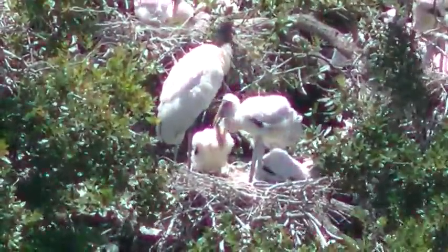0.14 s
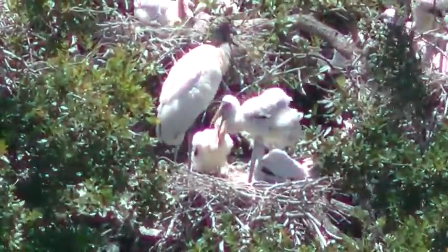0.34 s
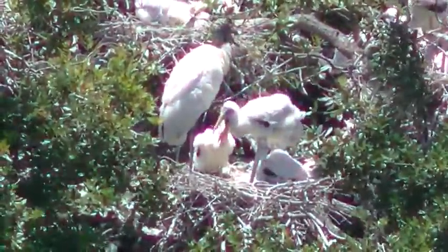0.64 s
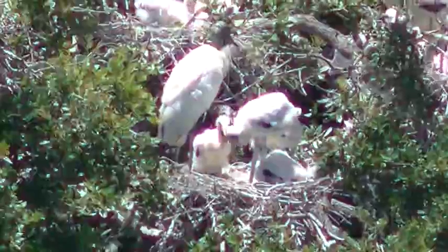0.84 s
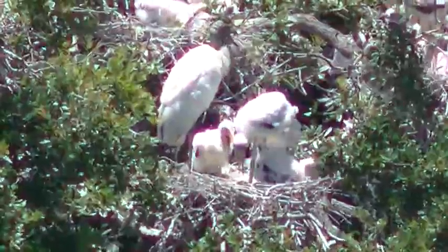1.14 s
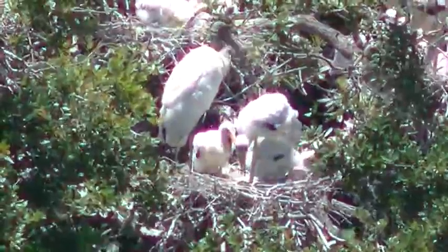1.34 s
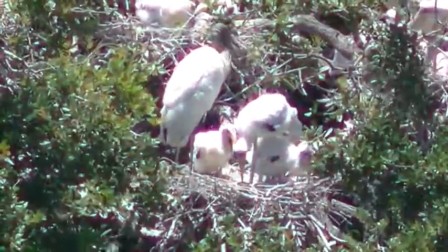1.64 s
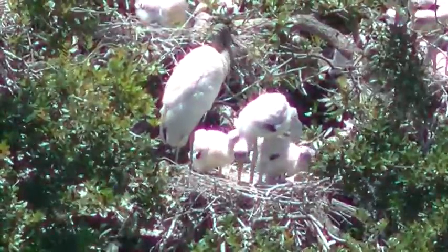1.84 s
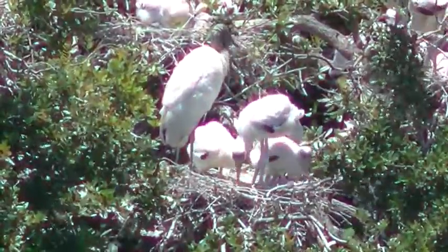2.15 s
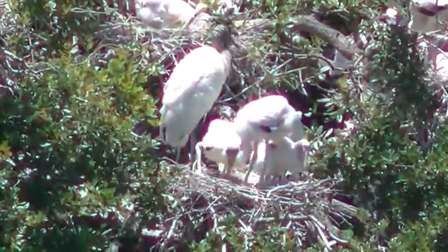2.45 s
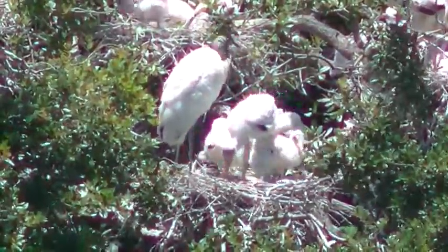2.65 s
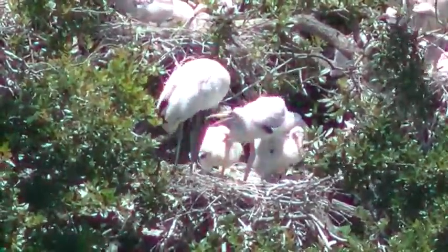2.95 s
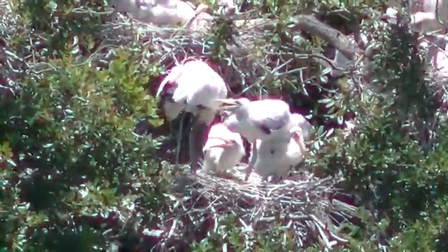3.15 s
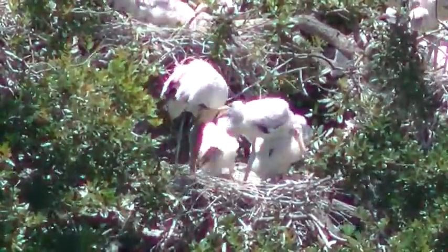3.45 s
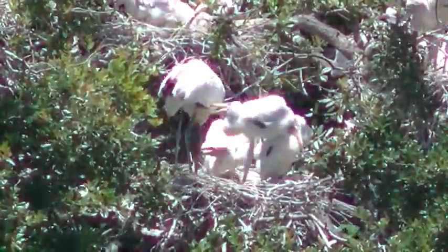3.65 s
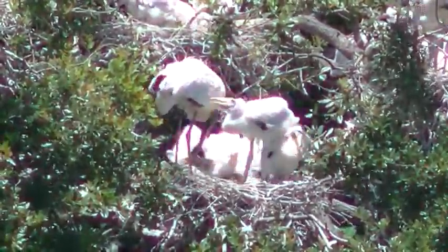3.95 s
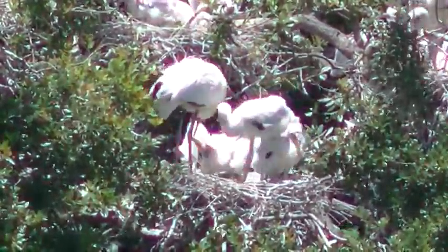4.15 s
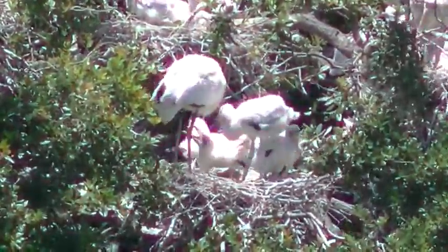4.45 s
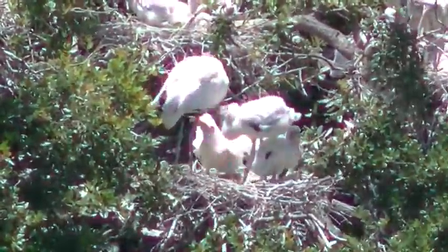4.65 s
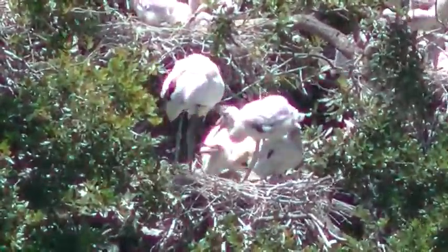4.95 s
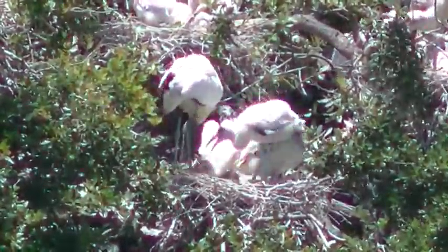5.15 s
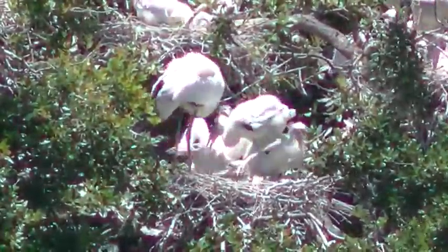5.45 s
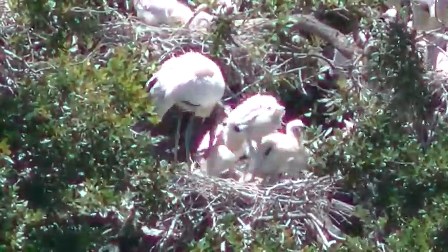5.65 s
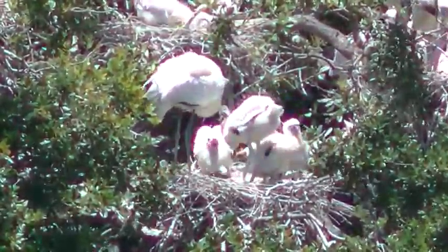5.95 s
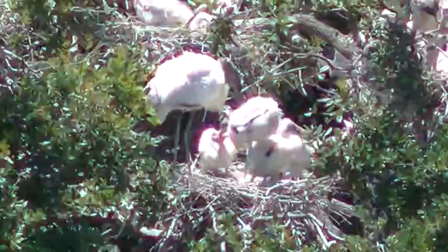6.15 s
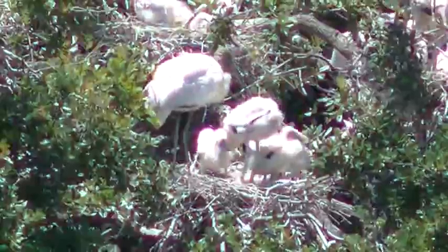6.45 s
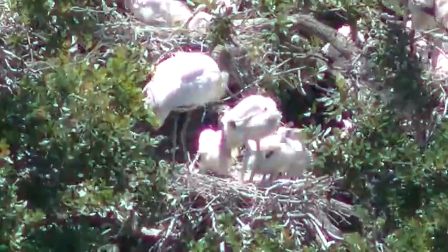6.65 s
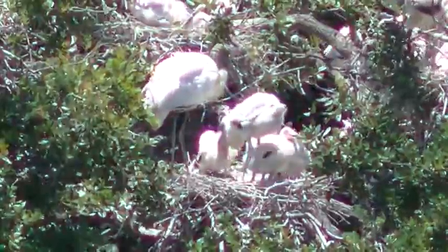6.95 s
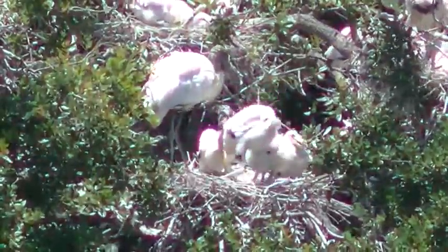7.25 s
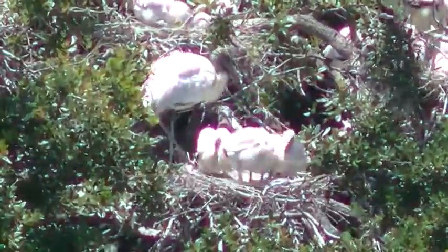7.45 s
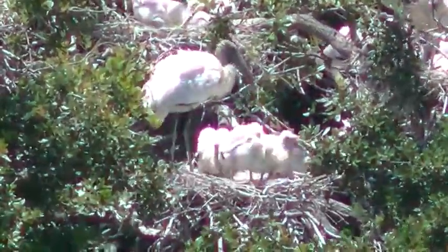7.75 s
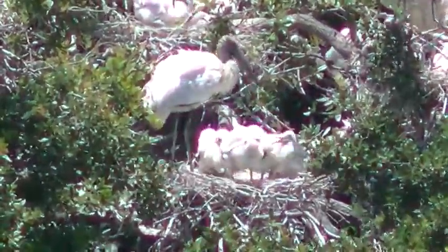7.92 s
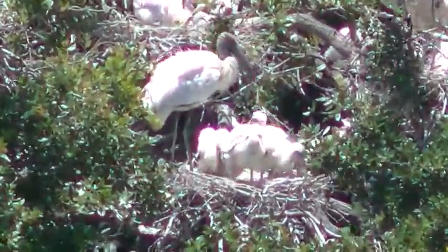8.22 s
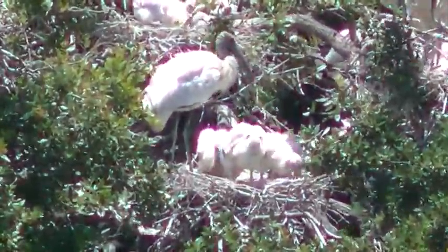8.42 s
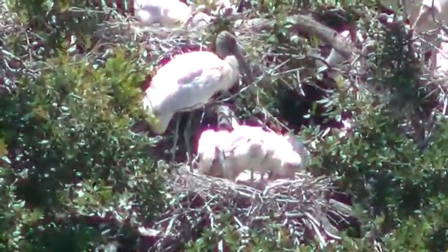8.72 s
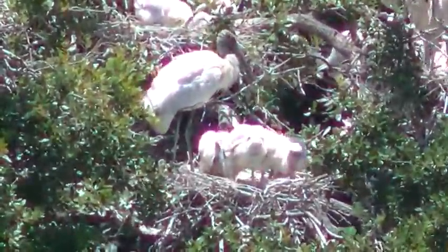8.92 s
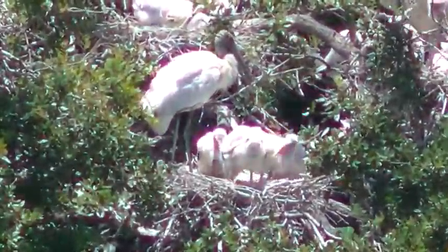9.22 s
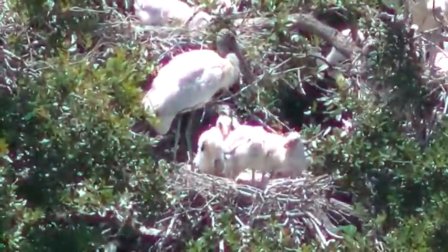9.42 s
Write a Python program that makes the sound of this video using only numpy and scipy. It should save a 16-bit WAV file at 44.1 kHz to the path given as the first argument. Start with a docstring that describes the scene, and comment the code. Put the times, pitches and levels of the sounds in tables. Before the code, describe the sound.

Twigs snap and leaves rustle close by while distant stork chicks chatter, then a songbird repeats two notes over a steady, high cicada buzz.

```python
"""Twigs snap and leaves rustle close by, while stork chicks squawk in a colony and songbirds whistle. After a
brief silence a wren repeats a two-note phrase and a cicada buzzes steadily. Breaking wood rings like a damped
oscillator; a squawk is a raspy source filtered by the throat; the cicada's buckling tymbals drive its resonant
abdomen. The trees scatter faint echoes, and the microphone doubles every sound a few milliseconds later, a comb
filter that sounds slightly hollow."""
import sys
import numpy as np
from scipy import signal
from scipy.fft import rfft, irfft
from scipy.io import wavfile
from scipy.ndimage import uniform_filter1d

SR = 44100
rng = np.random.default_rng(int(sys.argv[2]) if len(sys.argv) > 2 else 0)


def inscribe(sig):
    """Save sig as 16-bit PCM at rate SR to the path in sys.argv[1].

    A 1-D sig is mono; a 2-D sig holds one channel per row.
    Samples are clipped to [-1, 1] before scaling.
    """
    pcm = np.round(np.clip(np.atleast_2d(sig).T, -1, 1) * 32767)
    wavfile.write(sys.argv[1], SR, pcm.astype(np.int16))


N = 422468
TIME = np.arange(N) / SR
SILENCE_START_S, SILENCE_END_S = 3.3414, 3.3962
# spectrum of rubbing leaves and splintering wood: frequency_hz, density_db
RUSTLE_SPECTRUM = [(200, -31), (1200, -14.5), (1700, -2.5), (3000, -0.5), (4800, -2.5), (6500, -6),
                   (8000, -13), (9500, -15), (10800, -15), (12200, -8.5), (15500, -31)]


def gain_of(db):
    """Amplitude ratio of a level in decibels."""
    return 10 ** (np.asarray(db) / 20)


def unit_rms(x):
    """Normalisation to unit mean power."""
    return x / np.sqrt(np.mean(x ** 2) + 1e-20)


def over_time(rows):
    """Linear interpolation of each column between the times in the first."""
    time_s, *columns = np.transpose(rows)
    return [np.interp(TIME, time_s, column) for column in columns]


def at_bins(spectrum, size=N):
    """Interpolation in log frequency onto the bins of a Fourier transform."""
    hz, value = np.transpose(spectrum)
    return np.interp(np.log(np.fft.rfftfreq(size, 1 / SR) + 1), np.log(hz), value)


def coloured(x, spectrum):
    """Zero-phase filtering by a spectral envelope, normalised to unit power."""
    size = x.shape[-1]
    return unit_rms(irfft(rfft(x) * gain_of(at_bins(spectrum, size)), size))


def drift(per_s):
    """Random modulation of unit power: straight lines between Gaussian values."""
    knots = rng.standard_normal(4096)
    return unit_rms(np.interp(TIME * per_s, np.arange(len(knots)), knots))


def add(mix, start_s, sound):
    """Superposition of a sound on the mix, in place."""
    part = mix[max(round(start_s * SR), 0):][:len(sound)]
    part += sound[:len(part)]


def resonate(x, hz, width_hz):
    """A damped resonator of unit peak gain whose centre frequency may move."""
    carrier = np.exp(2j * np.pi * np.cumsum(hz * np.ones(len(x))) / SR)
    pole = np.exp(-np.pi * width_hz / SR)
    return 2 * (carrier * signal.lfilter([1 - pole], [1, -pole], x / carrier + 1e-18)).real


def highpass(x, hz, order):
    """Radiation efficiency: small bodies give off little bass."""
    return signal.sosfilt(signal.butter(order, hz, "highpass", fs=SR, output="sos"), x)


def bend(length_s, pitches_hz):
    """A parabolic glide through a start, a middle and an end pitch."""
    return np.polyval(np.polyfit([0, .5, 1], pitches_hz, 2), np.linspace(0, 1, int(length_s * SR)))


def note(hz, taper):
    """A pure tone with soft ends; its phase is the integral of its frequency."""
    return unit_rms(np.sin(2 * np.pi * np.cumsum(hz) / SR) * signal.windows.tukey(len(hz), taper))


def air():
    """Partly coherent noise: a steady outdoor hush, wide in the bass where the two sides differ."""
    # outdoor hush: frequency_hz, density_db
    spectrum = [(25, -20), (80, -17), (135, -4), (200, -9), (290, 0), (600, -2), (1200, -3), (3000, -3),
                (8000, -5), (12000, -3), (16000, -7)]
    # likeness of left and right: frequency_hz, correlation
    likeness = [(60, 0.033), (350, 0.011), (650, 0.95), (3000, 0.99), (8000, 0.28), (11500, 1)]
    correlation = np.clip(at_bins(likeness), 0, 1)
    left, independent = rfft(rng.standard_normal((2, N)))
    right = correlation * left + np.sqrt(1 - correlation ** 2) * independent
    return gain_of(-65) * coloured(irfft(np.array([left, right]), N), spectrum)


def tree_echoes(x, t60_s=0.091):
    """Scattering by trunks and leaves: sparse, decaying echoes, different on each side."""
    t = np.arange(SR // 2) / SR
    taps = rng.standard_normal((2, len(t))) * (rng.random((2, len(t))) < .05)
    taps *= gain_of(-60 * t / t60_s) * (t > .006)
    return signal.fftconvolve(x[None], taps / np.linalg.norm(taps[0]), axes=1)[:, :N]


def squawk(length_s, hz, throat_hz, rough, width_hz, fall=.17, scoop=0.1396, scoop_share=0.1299):
    """Source and filter: raspy harmonics scoop up and fall, through a sinking throat resonance."""
    progress = np.linspace(0, 1, int(length_s * SR))
    pitch_hz = hz * (1 - fall * progress ** 1.5 - scoop * np.exp(-progress / scoop_share))
    cycles = np.cumsum(pitch_hz) / SR
    voiced = sum(np.cos(2 * np.pi * k * cycles) for k in range(2, 10))
    rasp = rng.standard_normal(len(progress)) * (1 + np.cos(2 * np.pi * cycles))
    voice = (1 - rough) * unit_rms(voiced) + rough * unit_rms(rasp)
    formant_hz = throat_hz * (1 - fall * (progress - .5))
    for _ in range(2):
        voice = resonate(voice, formant_hz, width_hz)
    return unit_rms(voice * np.sin(np.pi * progress))


def colony(count=420, spread_db=8):
    """Incoherent summation: hundreds of far squawks, with those still farther off blurred to noise."""
    # the far colony: frequency_hz, density_db
    spectrum = [(600, -17.5), (1350, -12.5), (1600, -1), (1900, 4.5), (2700, 2), (3700, 2.5), (5000, 1),
                (6500, -6.5), (8500, -46), (15000, -9)]
    # its activity, one list before the silence and one after: time_s, level_db
    activity = [
        [(0.0, -56), (0.34, -59), (1.15, -61.5), (1.42, -61.5), (1.78, -56), (2.73, -64.5), (3.33, -61.5)],
        [(3.45, -52.5), (3.55, -55.5), (6.69, -54.5), (7.43, -53), (8.67, -57), (9.22, -54), (9.58, -58)],
    ]
    calls = np.zeros(N)
    for when, length, pitch, throat, rough, size in rng.random((count, 6)):
        call = squawk(0.0399 + .08 * length, 450 + 400 * pitch, 1700 + 3000 * throat,
                      0.85 * rough, width_hz=1100)
        add(calls, when * N / SR, gain_of(spread_db * size) * call)
    blur = rng.standard_normal(N) * gain_of(drift(30))
    chatter = gain_of(-4) * coloured(calls, spectrum) + gain_of(-1) * coloured(blur, spectrum)
    level_db, = over_time(np.vstack(activity))
    return gain_of(level_db) * chatter


def bird_calls(flutter_db=2, far_count=24, far_low_hz=1800, far_high_hz=4300, far_db=-69):
    """Modulated pure tones: near whistles, the falling overtones of a chick's squawk, and far slides."""
    # whistles and squawk overtones: start_s, length_s, start_hz, middle_hz, end_hz, level_db
    near_tones = [(0.053, 0.061, 3600, 3570, 3150, -58), (2.224, 0.026, 2900, 3130, 3420, -64),
                  (2.244, 0.058, 3970, 3800, 3700, -63), (2.333, 0.093, 4450, 4590, 4530, -56.5),
                  (2.41, 0.099, 1853, 1823, 1790, -60.5), (2.493, 0.058, 4090, 3960, 3600, -59),
                  (2.693, 0.022, 2830, 3100, 3400, -60), (2.698, 0.075, 4330, 4030, 3380, -61.5),
                  (2.786, 0.05, 3530, 2980, 2600, -56.5), (3.113, 0.227, 1930, 1883, 1930, -68),
                  (6.032, 0.068, 2880, 3324, 2990, -47), (5.841, 0.097, 2950, 2280, 2170, -61),
                  (6.286, 0.1, 2950, 2080, 2190, -57.5), (6.492, 0.049, 2930, 3143, 3220, -48.5),
                  (6.692, 0.077, 1605, 1924, 1600, -58.5), (6.806, 0.028, 2204, 2470, 2700, -56),
                  (6.895, 0.085, 4060, 3400, 3350, -45.5), (7.404, 0.06, 3710, 3800, 3740, -53),
                  (7.647, 0.16, 3120, 3040, 3100, -57), (8.179, 0.061, 3760, 3710, 3640, -56)]
    out, wobble = np.zeros(N), 1 + .018 * drift(400)
    for start_s, length_s, *pitches_hz, level_db in near_tones:
        hz = bend(length_s, pitches_hz)
        hz *= wobble[int(start_s * SR):][:len(hz)]
        add(out, start_s, gain_of(level_db) * note(hz, taper=0.34))
    for slot, (when, length, pitch, slide) in enumerate(rng.random((far_count, 4))):
        length_s = .06 * (.5 + length)
        glide = 1 + .09 * (2 * slide - 1) * np.linspace(-1, 1, int(length_s * SR))
        hz = far_low_hz * (far_high_hz / far_low_hz) ** pitch * glide
        add(out, (slot + when) / far_count * N / SR, gain_of(far_db) * note(hz, taper=0.91))
    return out * gain_of(flutter_db * drift(200))


def near_chicks(throat_ratio=4.58):
    """Formant resonance: each near chick's throat rings at the same multiple of its pitch."""
    # chick calls: start_s, length_s, pitch_hz, roughness, level_db
    calls = [(0.046, 0.075, 758, 0.2, -54), (1.105, 0.105, 760, .52, -56.5), (1.352, 0.085, 775, 0.62, -56),
             (2.71, .12, 800, .7, -60), (4.272, 0.021, 630, 0.74, -47.5), (4.629, 0.037, 610, 0.86, -48),
             (5.324, 0.056, 510, .7, -54), (5.397, .025, 675, 0.3, -50.5), (5.723, 0.1, 702, 0.9, -55),
             (5.852, 0.063, 711, 0.7, -52), (5.958, 0.066, 690, 0.9, -53.5), (7.524, .055, 516, 0.65, -56),
             (9.106, 0.071, 450, 0.83, -57), (9.488, .095, 440, 0.62, -51)]
    out = np.zeros(N)
    for start_s, length_s, pitch_hz, roughness, level_db in calls:
        call = squawk(length_s, pitch_hz, throat_ratio * pitch_hz, roughness, width_hz=1380)
        add(out, start_s, gain_of(level_db) * call)
    return out


def wren(pitch_hz=2497, drop_hz=656, rate_hz=58, depth_hz=248, trill_s=0.09, settle_s=.017):
    """Frequency modulation: a rising slur, then a note that drops into a fast, widening trill."""
    # two-note phrases: start_s, trill_db, slur_db
    phrases = [(3.355, -53, -53), (3.599, -53.5, -50.5), (3.847, -53, -52), (4.09, -53, -51.5),
               (4.339, -50.5, -54), (4.598, -51.5, -59), (4.881, -53.5, -59), (5.146, -52, -54.5),
               (5.415, -52.5, -52)]
    out, t = np.zeros(N), np.arange(0, trill_s, 1 / SR)
    unsettled = np.exp(-t / settle_s)
    slur = note(bend(length_s=0.0493, pitches_hz=(3080, 3470, 3510)), taper=0.45)
    for start_s, trill_db, slur_db in phrases:
        swing_hz = depth_hz * (1 - unsettled) * np.sin(2 * np.pi * (rate_hz * t + rng.random()))
        trill = note(pitch_hz + drop_hz * unsettled + swing_hz, taper=0.32)
        add(out, start_s, gain_of(slur_db) * slur)
        add(out, start_s + .07, gain_of(trill_db) * trill)
    return out


def friction(strokes, spectrum, grain_db, slips_per_s):
    """Stick-slip friction: short strokes of noise, made grainy by tiny uneven slips."""
    envelope = np.zeros(N)
    for start_s, length_s, level_db in strokes:
        add(envelope, start_s, gain_of(level_db) * signal.windows.tukey(int(length_s * SR), .5))
    slips = rng.standard_normal(N) * gain_of(grain_db * drift(slips_per_s))
    return envelope * coloured(slips, spectrum)


def handling_bumps():
    """Contact noise: handling makes soft, low strokes of friction."""
    # bumps: start_s, length_s, level_db
    strokes = [(1.51, 0.16, -65), (1.795, 0.028, -59.5), (1.86, 0.16, -59), (2.08, 0.04, -54.5),
               (2.292, 0.013, -59), (2.413, 0.07, -64.5), (2.51, 0.023, -56), (2.905, 0.05, -57),
               (2.96, 0.16, -70), (3.235, 0.016, -56.5)]
    # their dull colour: frequency_hz, density_db
    spectrum = [(30, -38), (130, -6), (240, -4), (450, 2), (900, -6), (1500, -8), (3000, -44)]
    return friction(strokes, spectrum, grain_db=4, slips_per_s=130)


def rustles():
    """Friction noise: leaves and twigs rub, and the drier ones add a crisp treble."""
    # rubbing strokes: start_s, length_s, level_db, relative_treble_db
    strokes = [(0.123, 0.16, -50, -7), (0.312, 0.11, -60.5, -3), (0.64, 0.12, -51, -11),
               (0.797, 0.067, -57, -9), (1.517, 0.12, -52, -21), (1.68, 0.27, -55, -25),
               (1.915, 0.089, -45.5, -20), (2.053, 0.072, -54, -15), (2.174, 0.03, -50.5, -15),
               (2.296, 0.13, -48.5, -9), (2.901, 0.047, -51, -18)]
    # treble of dry leaves: frequency_hz, density_db
    crisp_spectrum = [(3500, -20), (7000, -8), (9500, 0), (13000, -8), (16000, -3)]
    body = friction([row[:3] for row in strokes], RUSTLE_SPECTRUM, grain_db=4, slips_per_s=600)
    crisp = [(start_s, length_s, db + treble_db) for start_s, length_s, db, treble_db in strokes]
    return body + friction(crisp, crisp_spectrum, grain_db=2, slips_per_s=1400)


def after_rings(decay_s=0.052):
    """Free vibration: faint tones decay exponentially after the snap that struck them."""
    # lingering tones: start_s, pitch_hz, level_db
    tones = [(0.748, 4020, -58), (0.748, 2380, -59), (1.997, 795, -61.5)]
    out, t = np.zeros(N), np.arange(SR // 3) / SR
    for start_s, pitch_hz, level_db in tones:
        add(out, start_s, gain_of(level_db) * np.sin(2 * np.pi * pitch_hz * t) * np.exp(-t / decay_s))
    return out


def twig_snaps(knock_hz=1700, knock_s=0.0028, splinter_s=0.00096, tail_s=0.007, crack_s=0.00017):
    """Brittle fracture: a woody ring, a knock and splinters; brittle twigs crack more and knock less."""
    # breaking twigs: start_s, relative_energy_db, ring_hz, brittleness_db, ring_decay_s
    fractures = [(0.0785, -34.5, 9300, 6, 0.00095), (0.0903, -30, 1910, -16, 0.001),
                 (0.2937, -24, 3700, 3, 0.0013), (0.3206, -30, 2900, 12, 0.00051),
                 (0.383, -38, 9800, 11, 0.00099), (0.452, -38.5, 5080, 4, 0.001),
                 (0.7448, -32.5, 3070, 9, 0.0023), (0.8664, -35.5, 2970, 7, 0.00027),
                 (0.8973, -35, 3220, 8, 0.0003), (1.512, -35, 1570, -8, 0.0014),
                 (1.6606, -21, 3650, -20, 0.0012), (1.6664, -14, 4730, 6, 0.00053),
                 (1.802, -37, 1890, -11, 0.0022), (1.9113, -20, 3027, 2, 0.0051),
                 (1.996, -11.5, 3900, -10.5, 0.00048), (2.032, -34, 3790, 4, 0.00056),
                 (2.2977, -34.5, 1940, -1, 0.0055), (2.5171, -39, 3900, -15, 0.0011),
                 (2.8317, -38.5, 3940, 0, 0.002), (2.9193, -36.5, 3900, 11, 0.0013),
                 (2.9746, -41, 2200, -3, 0.00074), (3.0652, -35, 2770, -13, 0.0015),
                 (6.6299, -22.5, 5030, -1, 0.00058)]
    out, t = np.zeros(N), np.arange(2048) / SR
    for start_s, energy_db, ring_hz, brittle_db, ring_s in fractures:
        ring = np.sin(2 * np.pi * ring_hz * t) * np.exp(-t / ring_s)
        knock = gain_of(-22 - brittle_db) * np.sin(2 * np.pi * knock_hz * t) * np.exp(-t / knock_s)
        grit, spray = rng.standard_normal((2, len(t)))
        splinter_decay = np.exp(-t / splinter_s) + 0.3 * np.exp(-t / tail_s)
        splinters = 0.4 * coloured(grit, RUSTLE_SPECTRUM) * splinter_decay
        crack = gain_of(brittle_db - 5) * spray * np.exp(-t / crack_s)
        snap = ring + knock + splinters + crack
        snap /= np.linalg.norm(snap)  # the break sets the energy, however it splinters
        add(out, start_s + 0.000796, gain_of(energy_db + 12.5) * snap)
    return highpass(out, 1200, order=3)


def tymbal_clicks(lag_s, flutter=0.076):
    """An impulse train: two tymbals buckle in turn, the second weaker and slightly late."""
    # the buckling speeds up, then settles: time_s, cycle_hz
    rates = [(3.4, 132.75), (3.8, 133.6), (4.4, 135.36), (6.2, 138.9), (6.8, 139.85), (7.1, 139.1),
             (8.0, 139.2), (8.3, 138.45), (9.58, 138.65)]
    cycle_hz, = over_time(rates)
    cycles = np.cumsum(cycle_hz) / SR
    pulses = np.zeros(N)
    # half a cycle apart the tymbals favour even harmonics; half a ring period later, odd ones
    for strength, phase in ((1, cycles), (.75, cycles - .5 - lag_s * cycle_hz)):
        offset_samples = (phase % 1 - .5) / cycle_hz * SR
        pulses += strength * np.sinc(offset_samples / 2) * np.exp(-(offset_samples / 10) ** 2)
    return unit_rms(np.diff(pulses, prepend=0) * (1 + flutter * drift(270)))


def cicada(shimmer=0.68, fizz_db=-11, ease_s=0.6):
    """Forced resonance: tymbal clicks ring the hollow abdomen; uneven buckling makes the buzz rough."""
    # effort and tuning of the abdomen: time_s, level_db, resonance_hz
    effort = [(3.4, -52, 4520), (3.92, -52, 4670), (4.1, -50.5, 4720), (4.66, -48, 4820),
              (5.0, -50.5, 4850), (5.55, -49.5, 4890), (6.15, -46.5, 4490), (6.6, -54, 4750),
              (6.95, -47, 4560), (7.65, -48.5, 4430), (8.25, -49, 4830), (8.6, -49.5, 4660),
              (9.58, -49, 4530)]
    # high fizz of the buzz: frequency_hz, density_db
    fizz_spectrum = [(4000, -66), (6500, -40), (8200, -19), (9000, -1.5), (9500, 6.5), (9950, 10),
                     (10500, -0.5), (10900, -1.5), (11500, -2), (12700, -0.5), (13300, 0), (13900, -2.5),
                     (15800, -40)]
    # the stroke locks in, so the buzz clears and the second tymbal lags: start_s, end_s
    spells = [(4.0, 6.1), (8.12, 9.9)]
    level_db, resonance_hz = over_time(effort)
    locked = sum(np.clip(.5 + np.minimum(TIME - start, end - TIME) / ease_s, 0, 1)
                 for start, end in spells)
    noise_share = 0.4 - 0.24 * locked
    clicks = tymbal_clicks(lag_s=.00002 + .00008 * locked)
    # paths through moving leaves interfere, so single harmonics swell and fade
    scattered = sum(drift(12) * np.roll(clicks, lag) for lag in rng.integers(20, 250, size=3))
    clicks = unit_rms(clicks + shimmer * scattered)
    rasp = rng.standard_normal(N)
    body = np.sqrt(1 - noise_share) * clicks + np.sqrt(noise_share) * rasp
    for _ in range(4):
        body = resonate(body, uniform_filter1d(resonance_hz, size=8000), width_hz=1500)
    body = highpass(body, 4300, order=12)
    body /= np.sqrt(abs(uniform_filter1d(body ** 2, size=4000)) + 1e-20)  # steady total power
    fizz = coloured(.45 * clicks + rasp, fizz_spectrum) * gain_of(0.59 * drift(5.5))
    buzz = gain_of(level_db) * unit_rms(body) + gain_of(fizz_db + level_db.mean()) * fizz
    return (TIME > SILENCE_START_S) * buzz


def scene(near_width=0.25):
    """Superposition of the outdoor air, the direct sounds and their echoes from the trees."""
    birds = highpass(wren() + bird_calls() + near_chicks(), 1600, order=5)
    near = twig_snaps() + after_rings() + rustles() + handling_bumps()
    side = near_width * np.gradient(near)  # close sounds reach left and right slightly apart in time
    far = colony() + cicada()
    direct = air() + birds + near + np.array([side, -side]) + far
    return direct + tree_echoes(gain_of(-11.5) * birds + gain_of(-19) * far + gain_of(-21.5) * near)


def stereo_widening(x, comb_delay_s=0.000575):
    """Mid-side processing: a comb-filtered copy, added left and subtracted right, widens the sound."""
    # strength of the copy at the comb's peaks: frequency_hz, side_over_mid_db
    side_spectrum = [(300, -7), (1900, -8.5), (3500, -8.5), (5000, -11.5), (7000, -2), (10000, 3.5),
                     (12000, -7.5), (15000, -67)]
    comb = np.cos(np.pi * np.fft.rfftfreq(N, 1 / SR) * comb_delay_s)
    side = irfft(1j * rfft(x.mean(0)) * comb * gain_of(at_bins(side_spectrum)), N)
    return x + np.array([side, -side])


def record(dry, early_hz=8800, early_gain=1.3, delay_samples=166, edge_hz=15900):
    """Comb filtering: a duller copy runs just ahead of the full sound; then a brief silence and band limit."""
    early = signal.oaconvolve(dry, signal.firwin(31, early_hz, fs=SR)[None], "same")
    late = np.pad(dry, ((0, 0), (delay_samples, 0)))[:, :N]
    doubled = stereo_widening(early_gain * early + late) / np.hypot(1, early_gain)
    live = (TIME < SILENCE_START_S) | (TIME > SILENCE_END_S)
    band_limit = signal.firwin(511, edge_hz, window=("kaiser", 9), fs=SR)
    return signal.oaconvolve(doubled * live, band_limit[None], "same")


dry = scene()
out = record(dry)
inscribe(out)
```